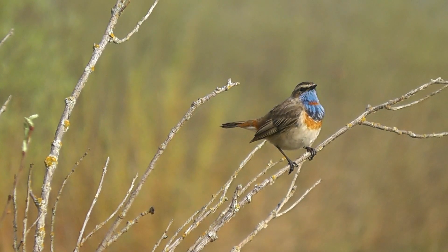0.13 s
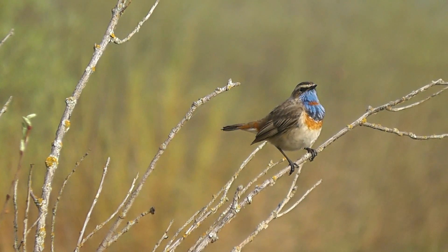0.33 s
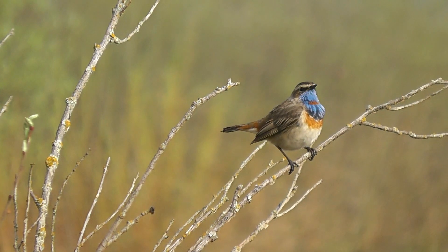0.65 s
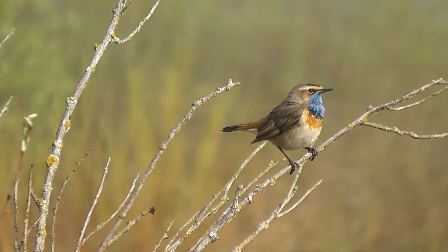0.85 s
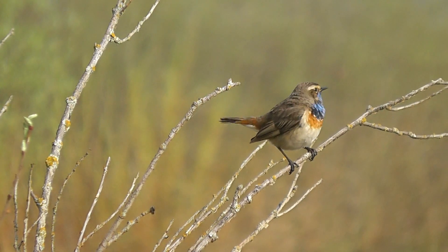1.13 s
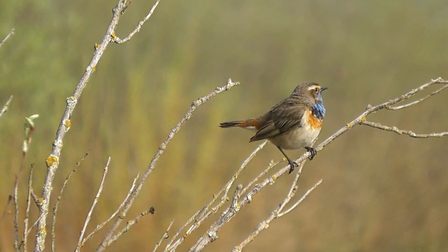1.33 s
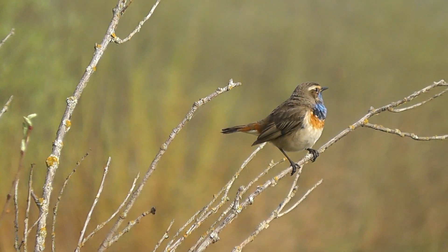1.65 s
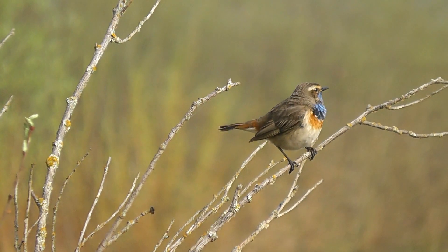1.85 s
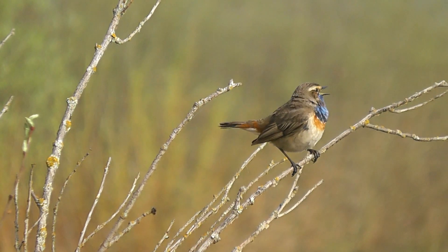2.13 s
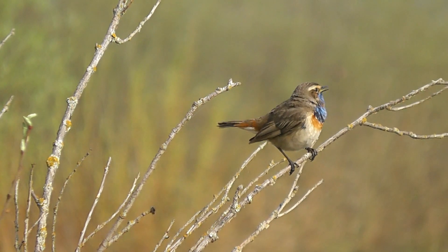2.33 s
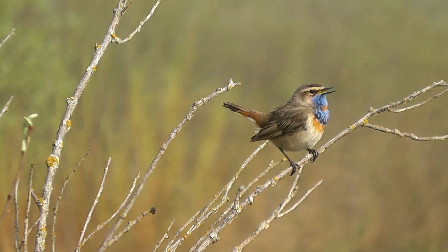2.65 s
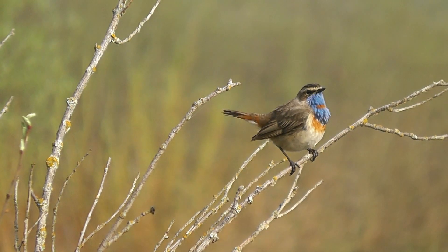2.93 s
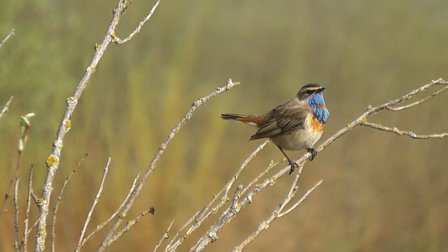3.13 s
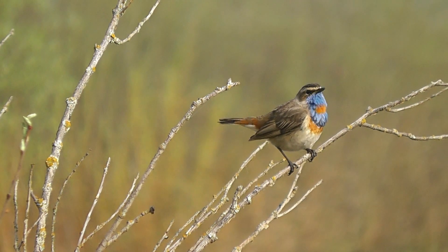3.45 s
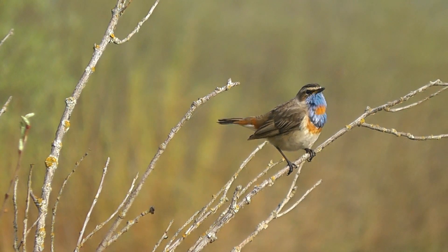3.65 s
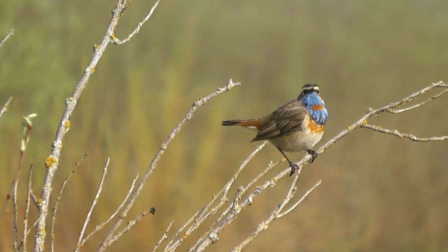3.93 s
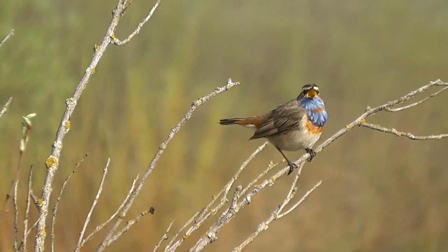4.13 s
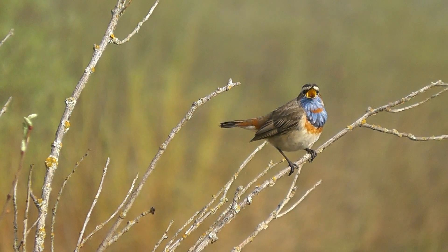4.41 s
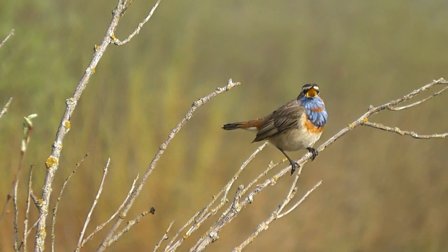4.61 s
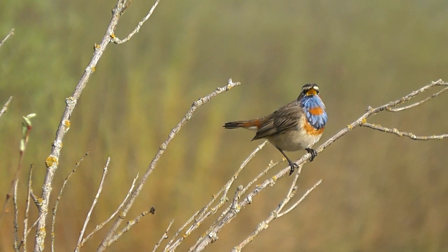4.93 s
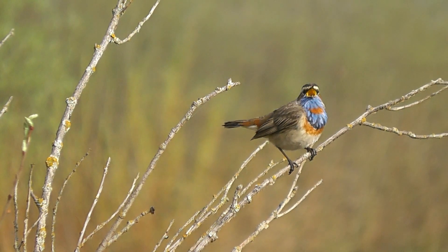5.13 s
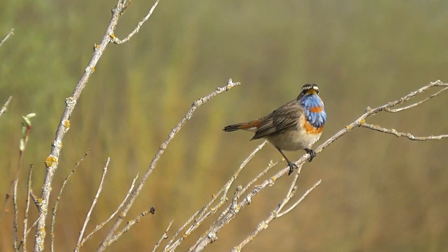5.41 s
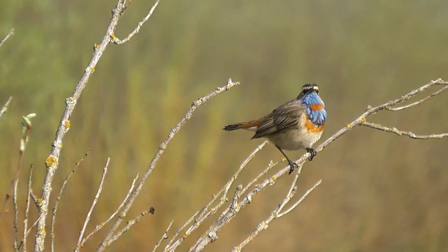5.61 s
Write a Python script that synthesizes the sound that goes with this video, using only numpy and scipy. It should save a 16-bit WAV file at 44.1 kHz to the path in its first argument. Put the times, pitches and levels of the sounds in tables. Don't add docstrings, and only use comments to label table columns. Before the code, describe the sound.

Open scrubland birdsong, quiet scratchy chips at first, clear rising-falling whistles mid-way, then a loud clicking flourish and fast high trill.

```python
import sys
import numpy as np
from scipy import signal
from scipy.fft import rfft, irfft, next_fast_len
from scipy.io import wavfile
from scipy.ndimage import uniform_filter1d, map_coordinates

SR = 44100
rng = np.random.default_rng(int(sys.argv[2]) if len(sys.argv) > 2 else 0)


def output_pcm(signal):
    pcm = np.clip(np.atleast_2d(signal).T, -1, 1) * 32767
    wavfile.write(sys.argv[1], SR, np.round(pcm).astype(np.int16))


def convert_level_to_amplitude(level_db):
    exponent = np.asarray(level_db, float) / 20
    return 10 ** exponent


N = 254456

# (time [s], level [dB])
RUMBLE_LEVEL = [(0, -55.5), (.55, -56.5), (.7, -50), (.95, -57), (1.6, -58.5), (4.4, -56), (5.77, -56)]
# (frequency [Hz], level [dB per Hz])
RUMBLE = [(12, -47), (20, -37.5), (70, 2.5), (88, 2), (200, -12.5), (260, -50.5), (440, -120)]
# (frequency [Hz], level [dB per Hz])
AIR = [(88, -28.5), (150, -2), (235, -2.5), (466, 0), (774, -3.5), (837, -3.5), (1560, -13.5),
       (1900, -16.5), (2220, -20), (4860, -20.5), (7620, -31), (16000, -34)]
# (time [s], level [dB])
CHORUS = [(0, -63.5), (1.9, -62), (2.4, -63), (3.3, -63.5), (4.1, -54.5), (5.77, -60)]
# (frequency [Hz], correlation [-1 to 1])
ALIKE = [(30, .3), (60, 0.72), (150, 0.2), (500, 0.19), (2000, 0.18), (4000, 0.97), (9000, 0.94),
         (13000, 0.33)]
# (frequency [Hz], difference [dB])
LEAN = [(60, 6.5), (240, 4.5), (950, -1.5), (3770, -4.5), (15000, 0.5)]
# (frequency [Hz], time to fall 60 dB [s])
SCRUB = [(1500, 0.66), (4500, 0.29), (8000, 0.57), (14000, 0.04)]
# (frequency [Hz], gain [dB])
THROAT = [(1500, -11.5), (2500, -18), (3600, -2.5), (4700, -1), (6000, -5.5), (7200, -19), (10000, -38),
          (15000, -37)]
# (time [s], pitch [Hz], level [dB])
FAR_NOTES = [
    [(3.652, 4370, -48), (3.665, 3700, -48), (3.682, 2720, -67)],
    [(3.715, 4410, -42), (3.73, 3620, -52), (3.75, 2960, -57)],
    [(3.785, 4210, -55), (3.8, 3600, -47), (3.817, 2770, -60)],
    [(3.853, 4350, -44), (3.868, 3540, -46), (3.886, 2940, -59)],
    [(3.92, 4300, -52), (3.935, 3620, -46), (3.953, 2770, -64)],
    [(4.232, 2430, -66), (4.25, 3210, -61), (4.27, 3560, -52.5), (4.3, 3550, -49)],
    [(4.4, 4280, -45), (4.41, 4640, -48.5), (4.422, 4600, -51)],
    [(4.423, 6070, -43), (4.435, 5070, -43), (4.446, 4080, -44)],
    [(4.435, 2860, -63), (4.47, 3320, -55), (4.51, 3400, -57)],
    [(4.435, 2400, -73), (4.465, 2300, -64)],
    [(4.52, 4120, -50), (4.54, 4440, -43), (4.556, 4540, -41)],
    [(4.557, 6150, -41), (4.567, 4960, -40.5), (4.577, 4480, -40)],
    [(4.58, 2560, -80), (4.59, 3430, -50.5), (4.596, 4700, -31)],
    [(4.645, 3110, -64), (4.665, 2540, -61), (4.68, 2230, -61)],
    [(4.895, 1890, -58), (4.91, 1813, -55), (4.96, 1766, -60), (5.02, 1780, -66)],
    [(5.362, 1880, -72), (5.38, 1834, -56), (5.41, 1807, -55.5), (5.45, 1800, -69)],
    [(5.057, 2584, -63), (5.077, 1634, -56)],
    [(5.257, 3310, -72), (5.28, 2690, -65), (5.31, 2200, -75)],
    [(5.352, 2670, -70), (5.37, 3290, -61)],
    [(5.512, 2820, -73), (5.525, 2140, -57), (5.535, 1650, -55)],
    [(5.6, 2650, -65), (5.612, 2520, -60), (5.624, 2190, -55)],
    [(1.18, 5330, -69), (1.22, 5100, -69), (1.265, 5060, -76)],
    [(2.95, 2640, -60), (2.98, 2350, -67), (3.01, 2160, -66)],
    [(3.425, 2980, -70), (3.46, 2900, -68), (3.475, 2630, -64.5), (3.53, 2720, -78)],
    [(0.64, 4880, -43), (0.655, 4710, -45.5), (0.67, 4400, -56), (0.705, 4440, -53)],
    [(0.645, 7280, -67), (0.665, 6720, -64), (0.69, 6730, -61), (0.72, 6540, -67)],
    [(0.708, 5870, -55), (0.73, 5660, -55), (0.755, 5630, -56), (0.78, 5950, -64)],
    [(1.545, 5600, -58), (1.56, 6350, -66), (1.6, 6470, -72)],
    [(2.73, 3410, -74), (2.75, 2730, -62), (2.77, 2140, -60)],
]
# (time [s], peak [dB], beak resonance [Hz])
CHIPS = [(0.0004, -37.5, 4370), (0.0144, -43, 5550), (0.0274, -34, 4950), (0.0643, -43, 4550),
         (0.1204, -44, 4260), (0.1384, -37, 4680), (0.17, -42.5, 4850), (0.2334, -43, 4630),
         (0.2523, -42.5, 4500), (0.2838, -49.5, 4550), (0.5906, -47, 3550), (0.609, -43.5, 3480),
         (0.6264, -41, 4800), (1.1644, -48, 4530), (1.2945, -50, 2910), (1.3154, -42.5, 4480),
         (1.5643, -52, 3450), (1.5813, -43.5, 3460), (1.6013, -46, 3730), (1.8352, -51, 3420),
         (1.8514, -46, 3960), (1.8704, -46, 5150)]
# (time [s], peak [dB], beak resonance [Hz])
CHURRS = [(1.346, -37, 4760), (1.3744, -43, 5150), (1.405, -36, 5020), (1.447, -41, 4860),
          (1.478, -42.5, 4850), (1.6253, -42, 4630), (1.6651, -43.5, 4580), (1.6874, -40, 4770),
          (1.8832, -39.5, 5080), (1.9101, -40.5, 5350), (1.94, -42.5, 4930), (3.3363, -43.5, 5000),
          (3.445, -47.5, 5490), (3.464, -45, 4960), (3.5734, -40.5, 4830), (3.802, -38.5, 5310),
          (3.9468, -43.5, 5450), (4.0194, -47, 5310), (4.0467, -61, 5360)]
# (time [s], peak [dB])
RATTLE = [(2.3436, -59), (2.365, -52), (2.4053, -58), (2.427, -53), (2.4698, -53), (2.4926, -51),
          (2.5311, -55.5), (2.5558, -51.5), (2.5964, -50.5), (2.619, -54), (2.6633, -55), (2.6868, -50.5),
          (2.7262, -54), (2.748, -54.5), (2.7838, -54), (2.809, -50), (2.8539, -55), (2.8774, -50),
          (2.9117, -57), (2.9334, -56.5), (2.9716, -61), (2.9971, -58), (3.038, -62), (3.0574, -71)]
# (time [s], peak [dB])
CROAKS = [(3.1844, -51), (3.2352, -60), (3.8418, -57), (3.875, -54), (3.9052, -52), (4.4638, -54),
          (4.4987, -50.5), (4.5294, -48), (4.5566, -51), (4.5888, -51.5), (4.7144, -50)]
# (time [s], pitch [Hz], level [dB])
NASAL = [
    [(.335, 1450, -61), (.36, 1550, -60), (.39, 1570, -52)],
    [(1.017, 950, -68), (1.032, 950, -43.5), (1.045, 820, -53.5), (1.055, 680, -78)],
    [(2.07, 830, -78), (2.088, 790, -53.5), (2.11, 580, -65)],
    [(2.225, 1030, -57), (2.245, 880, -53.5), (2.27, 640, -59)],
    [(4.05, 603, -66), (4.1, 620, -64), (4.15, 650, -59), (4.19, 690, -70)],
]
BEAKS = [4700, 4300, 3600, 4170, 3400]
# (time from its start [s], pitch [Hz], level [dB])
ZIGZAG = [(0, 4550, -16), (.006, 5500, 1), (.013, 3760, -13), (.019, 5320, 6.5), (.026, 3800, -0.5),
          (.032, 4900, 7.5), (.036, 4300, -4)]
# (time [s], level [dB])
WARBLES = [(3.616, -49), (3.684, -45.5), (3.75, -46.5), (3.819, -45), (3.888, -45)]
# (time [s], middle pitch [Hz], level [dB])
CLIMB = [(.884, 4200, -48), (.915, 4800, -46), (.98, 6100, -50), (1.043, 6700, -53), (1.12, 6750, -57),
         (1.194, 7000, -62)]
# (time [s], level [dB])
RASPS = [
    [(.385, -49), (.417, -51), (.43, -57)],
    [(.452, -66), (.466, -49), (.495, -59)],
    [(.63, -53.5), (.772, -54.5), (.8, -48)],
    [(.83, -58.5), (.9, -52), (.99, -56)],
    [(4.22, -58), (4.29, -45), (4.33, -64)],
    [(4.45, -51.5), (4.53, -45), (4.6, -50)],
    [(4.72, -51.5), (4.778, -44), (4.892, -46.5)],
]
# (time [s], level [dB])
SNAPS = [
    [(3.9915, -43), (3.998, -45)],
    [(5.5518, -40), (5.558, -41)],
]
# (time [s], peak [dB], ring [Hz])
CLICKS = [(0.4516, -41, 4730), (4.2977, -22.5, 4470), (4.3096, -26.5, 4490), (4.42, -35, 4640),
          (4.5109, -27.5, 4200), (4.516, -24, 4380), (4.5264, -32.5, 4350), (4.5445, -26.5, 4600),
          (4.576, -24.5, 4730), (4.6456, -34, 4800), (4.6708, -37.5, 4590), (4.6994, -36.5, 4580),
          (4.7742, -31, 4100), (4.78, -25.5, 4600), (4.8309, -26.5, 4700), (4.8447, -19, 4670)]
TRILL = [5.004, 5.012, 5.021, 5.03, 5.04, 5.051, 5.062, 5.073, 5.085, 5.095, 5.107, 5.12, 5.13, 5.141,
         5.152, 5.162, 5.173, 5.183, 5.194, 5.205, 5.216, 5.226, 5.236, 5.248, 5.257, 5.267, 5.278, 5.288,
         5.297, 5.307, 5.318, 5.328, 5.34]
# (time [s], middle pitch [Hz], level [dB])
SWELL = [(5.0, 4170, -30.5), (5.03, 4320, -29), (5.06, 4330, -23.5), (5.1, 4460, -22), (5.2, 4490, -23),
         (5.3, 4420, -21), (5.34, 4500, -22.5)]
# (time [s], pitch [Hz], level [dB])
WHISTLES = [
    [(2.58, 3630, -65), (2.605, 4230, -43.5), (2.622, 4680, -41.5), (2.636, 4850, -29), (2.65, 4620, -36.5),
     (2.665, 3900, -44), (2.685, 3600, -57)],
    [(2.787, 3990, -46), (2.805, 4260, -36), (2.82, 4704, -31.5), (2.842, 4860, -25), (2.852, 4440, -35.5),
     (2.865, 3890, -45), (2.888, 3650, -50)],
    [(3.478, 3830, -50.5), (3.497, 4250, -32), (3.51, 4570, -35), (3.52, 4700, -29), (3.54, 4818, -24),
     (3.55, 4460, -33.5), (3.562, 3910, -42), (3.585, 3660, -50)],
    [(3.687, 3870, -41.5), (3.705, 4170, -35.5), (3.722, 4580, -34), (3.74, 4820, -24.5),
     (3.752, 4530, -29.5), (3.765, 4000, -37.5), (3.785, 3630, -45)],
    [(4.873, 3110, -56), (4.879, 3550, -29.5), (4.886, 3690, -24.5), (4.896, 3370, -31), (4.906, 3210, -36),
     (4.915, 2580, -51.5)],
    [(4.984, 4070, -45), (4.989, 4280, -33), (4.996, 4140, -34)],
    [(5.352, 4390, -15), (5.36, 3970, -41), (5.371, 3746, -41.5), (5.382, 3930, -32), (5.389, 4290, -22.5),
     (5.4, 4430, -28.5), (5.415, 4687, -22), (5.425, 4614, -27), (5.433, 4460, -47)],
    [(2.085, 6800, -69), (2.11, 6440, -53), (2.13, 6490, -49.5), (2.148, 5680, -42), (2.16, 5300, -52)],
    [(2.222, 6400, -58), (2.245, 6450, -54), (2.265, 5910, -44), (2.28, 5350, -39.5), (2.291, 4450, -44)],
    [(2.315, 6400, -58), (2.335, 6260, -49), (2.352, 5800, -42.5), (2.368, 4730, -41.5)],
    [(2.41, 6400, -55), (2.43, 6210, -46), (2.445, 5710, -39), (2.459, 4430, -43.5)],
    [(2.978, 7100, -76), (3.0, 6930, -58), (3.02, 6340, -53), (3.045, 5970, -52)],
    [(3.133, 5500, -38), (3.145, 5070, -39), (3.16, 4630, -49.5), (3.18, 4400, -51)],
    [(0.787, 2720, -70), (0.82, 2810, -61), (0.85, 3370, -54.5), (0.875, 3530, -43)],
]


def unit(x):
    return x / np.sqrt(np.mean(x ** 2) + 1e-20)


def along(points, hz):
    f, v = np.transpose(points)
    return np.interp(np.log(hz + 1), np.log(f + 1), v)


def on_curve(times, rows):
    s, hz, db = np.transpose(rows)
    return np.transpose([times, np.interp(times, s, hz), np.interp(times, s, db)])


def wobble(rate, count=N):
    knots = rng.standard_normal(int(count * rate / SR) + 4)
    return map_coordinates(knots, [np.arange(count) * rate / SR])


def filtered(x, response):
    m = next_fast_len(N + 8192)
    return irfft(rfft(x, m) * response(np.fft.rfftfreq(m, 1 / SR)), m)[..., :N]


def add(track, s, sound):
    part = track[max(round(s * SR), 0):][:len(sound)]
    part += sound[:len(part)]


def rush(response, patchy_db):
    z = signal.stft(rng.standard_normal((2, N)), nperseg=512)[2]
    patches = uniform_filter1d(rng.standard_normal(z.shape[1:]), size=5, axis=0)
    patches = uniform_filter1d(patches, size=8, axis=1)
    pair = signal.istft(z * convert_level_to_amplitude(patchy_db * unit(patches)), nperseg=512)[1][:, :N]

    def mid_side(hz):
        turn = np.arccos(np.clip(along(ALIKE, hz), -1, 1)) / 2
        return response(hz) * np.array([np.cos(turn), np.sin(turn)])

    mid, side = filtered(pair, mid_side)
    stereo = unit(np.array([mid + side, mid - side]))
    return filtered(stereo, lambda hz: convert_level_to_amplitude(np.outer([.5, -.5], along(LEAN, hz))))


def field():
    t = np.arange(N) / SR
    rumble_db, chorus_db = [np.interp(t, *np.transpose(rows)) for rows in (RUMBLE_LEVEL, CHORUS)]

    def band(centre_hz, width_hz):
        return lambda hz: np.exp(-((hz - centre_hz) / width_hz) ** 2)

    rumble = convert_level_to_amplitude(rumble_db + 1.0) * rush(lambda hz: convert_level_to_amplitude(along(RUMBLE, hz)), patchy_db=0.57)
    air = convert_level_to_amplitude(-54) * rush(lambda hz: convert_level_to_amplitude(along(AIR, hz)), patchy_db=0.68)
    chorus = convert_level_to_amplitude(chorus_db - 4.5) * rush(lambda hz: convert_level_to_amplitude(0.87 * along(THROAT, hz)), patchy_db=5.0)
    insects = convert_level_to_amplitude(-70.5 + 2.0 * wobble(30)) * rush(band(1905, 99), patchy_db=-2.0)
    hum = convert_level_to_amplitude(-69) * rush(band(842, 3.9), patchy_db=-2.2)
    return rumble + air + chorus + insects + hum


def scrub(x, delay_s):
    hz, t, z = signal.stft(rng.standard_normal((3, SR // 2)), SR, nperseg=128)
    tail = signal.istft(z * convert_level_to_amplitude(-60 * t / along(SCRUB, hz)[:, None]), SR, nperseg=128)[1]
    tail = tail[0] + .4 * tail[1:]
    late = np.pad(x, (round(delay_s * SR), 0))[None]
    return signal.fftconvolve(late, tail / np.linalg.norm(tail[0]), axes=1)[:, :N]


def note(rows, fade_s):
    s, hz, db = np.transpose(rows)
    t = np.arange(s[0] - fade_s, s[-1] + fade_s, 1 / SR)
    pitch = uniform_filter1d(np.interp(t, s, hz), size=130)
    phase = 2 * np.pi * np.cumsum(pitch) / SR
    edge = np.clip(np.minimum(t - t[0], t[-1] - t) / (2 * fade_s), 0, 1) ** 2
    return t[0], phase, pitch, np.sqrt(2) * edge * convert_level_to_amplitude(np.interp(t, s, db))


def syrinx(phase, second_db, third_db):
    return np.sin(phase) + convert_level_to_amplitude(second_db) * np.sin(2 * phase) + convert_level_to_amplitude(third_db) * np.sin(3 * phase)


def whistles(notes, second_db, third_db, flutter_db):
    out = np.zeros(N)
    for rows in notes:
        s, phase, _, gain = note(rows, fade_s=.003)
        breath = convert_level_to_amplitude(flutter_db * wobble(162, count=len(gain)))
        add(out, s, gain * breath * syrinx(phase, second_db, third_db))
    return out


def pulses(rows, length_s, fall, second_db, third_db, flutter_db):
    out, u = np.zeros(N), np.linspace(0, 1, round(length_s * SR))
    for (s, hz, db), share in zip(rows, np.linspace(fall[0], fall[-1], len(rows))):
        pitch = hz * (1 + share * (.4 - u))
        phase = 2 * np.pi * np.cumsum(pitch) / SR + rng.uniform(0, 2 * np.pi)
        shape = np.sin(np.pi * u ** .8) ** 1.3
        shape = shape * convert_level_to_amplitude(flutter_db * wobble(350, count=len(u)))
        add(out, s - .4 * length_s, convert_level_to_amplitude(db + 2.5) * shape * syrinx(phase, second_db, third_db))
    return out


def chips(rows, length_s, pitch_hz, width, skirt, rough_db):
    out, u = np.zeros(N), np.linspace(0, 1, round(length_s * SR))
    for s, db, hz in rows:
        f0 = hz / np.round(hz / (pitch_hz * np.exp(rng.normal(0, .1))))
        sag = 1.03 - .06 * u + .04 * wobble(300, count=len(u))
        phase = 2 * np.pi * np.cumsum(f0 * sag) / SR
        tone = np.zeros(len(u))
        for k in range(3, 24):
            beak = np.exp(-(np.log(k * f0 / hz) / width) ** 2) + skirt
            throat = convert_level_to_amplitude(0.52 * along(THROAT, k * f0))
            tone += throat * beak * np.cos(k * phase + rng.normal(0, 1.0))
        gain = convert_level_to_amplitude(db - 7.5 + rough_db * wobble(537, count=len(u))) * np.sin(np.pi * u ** .75)
        add(out, s - .15 * length_s, gain * unit(tone))
    return out


def nasal(width):
    out = np.zeros(N)
    for rows, beak_hz in zip(NASAL, BEAKS):
        s, phase, pitch, gain = note(rows, fade_s=0.0044)
        for k in range(2, 11):
            strength = np.exp(-(np.log(k * pitch / beak_hz) / width) ** 2)
            strength = strength * convert_level_to_amplitude(2.4 * wobble(140, count=len(gain)))
            add(out, s, gain * strength * np.sin(k * phase + rng.uniform(0, 2 * np.pi)))
    return out


def warbles():
    songs = [np.add(ZIGZAG, [s, 0, db]) for s, db in WARBLES]
    return whistles(songs, second_db=-40, third_db=-53, flutter_db=4.0)


def trills():
    k = np.arange(21)
    climb = on_curve(.884 + .0163 * k - .00004 * k ** 2, CLIMB)
    buzz = on_curve(3.054 + .0118 * k[:7], [(3.05, 6050, -51), (3.13, 6150, -48)])
    slur = on_curve(3.138 + .0055 * k[:8], [(3.135, 5300, -45), (3.155, 4800, -45), (3.18, 4500, -52)])
    out = pulses(slur, length_s=.006, fall=[.2], second_db=-37, third_db=-60, flutter_db=5.0)
    out += pulses(climb, length_s=.019, fall=[.42, .1], second_db=-36, third_db=-60, flutter_db=5.5)
    out += pulses(buzz, length_s=.012, fall=[.3], second_db=-38, third_db=-60, flutter_db=5.5)
    return out


def neighbours():
    far = whistles(FAR_NOTES, second_db=-34.5, third_db=-45, flutter_db=3.5)
    far += warbles() + nasal(width=.32) + trills()
    far += chips(CHIPS, length_s=.009, pitch_hz=522, width=0.23, skirt=0.17, rough_db=2.0)
    far += chips(CHURRS, length_s=0.026, pitch_hz=353, width=0.054, skirt=0.12, rough_db=0.0)
    rattle = [(s, db + 12.5, 4500) for s, db in RATTLE]
    far += chips(rattle, length_s=.013, pitch_hz=564, width=0.26, skirt=.12, rough_db=3.5)
    croaks = [(s + .008, 1800, db - 8) for s, db in CROAKS]
    far += pulses(croaks, length_s=0.02, fall=[.1], second_db=-35, third_db=-47, flutter_db=6.0)
    return far


def rasps(rate, scatter_db):
    slips = (rng.random(N) < rate / SR) * convert_level_to_amplitude(scatter_db * rng.exponential(size=N))
    slips = slips * rng.choice([-1, 1], N)
    level = np.zeros(N)
    for rows in RASPS + SNAPS:
        s, db = np.transpose(rows)
        t = np.arange(s[0], s[-1], 1 / SR)
        add(level, s[0], convert_level_to_amplitude(np.interp(t, s, db)) * signal.windows.tukey(len(t), .25))
    return level * unit(filtered(slips, lambda hz: convert_level_to_amplitude(1.67 * along(THROAT, hz / 1.1))))


def clicks():
    out, t = np.zeros(N), np.arange(400) / SR
    for s, db, hz in CLICKS:
        phase = 2 * np.pi * np.cumsum(hz * (1 + 0.39 * np.exp(-t / 0.00038))) / SR
        ring = np.sin(phase) * convert_level_to_amplitude(-60 * t / 0.0097) * (1 - np.exp(-t / 0.0004))
        hiss = np.convolve(rng.standard_normal(len(t)), [1, 1, -1, -1], "same")
        puff = hiss * convert_level_to_amplitude(-60 * t / 0.0049) * (1 - np.exp(-t / 0.00032))
        add(out, s, convert_level_to_amplitude(db + 3) * (ring + convert_level_to_amplitude(-30) * puff))
    return out


def trill():
    rows = on_curve(TRILL, SWELL)
    return pulses(rows, length_s=.006, fall=[.27, .15], second_db=-43, third_db=-42, flutter_db=.4)


def singer():
    near = whistles(WHISTLES, second_db=-38, third_db=-39, flutter_db=1.44)
    return near + trill() + clicks() + rasps(rate=3000, scatter_db=1.5)


def scene():
    far, near = neighbours(), singer()
    bounce = convert_level_to_amplitude(-11) * np.pad(near, (round(.0022 * SR), 0))[:N]
    wet = convert_level_to_amplitude(-15) * scrub(near, delay_s=.006) + convert_level_to_amplitude(-7.5) * scrub(far, delay_s=.003)
    return near + bounce + far + wet + field()


def roll_off(x):
    return signal.sosfilt(signal.butter(12, 16310, fs=SR, output="sos"), x)


def record(dry):
    mix = filtered(dry, lambda hz: hz < 15800)
    return roll_off(mix)


dry = scene()
out = record(dry)
output_pcm(out)
```